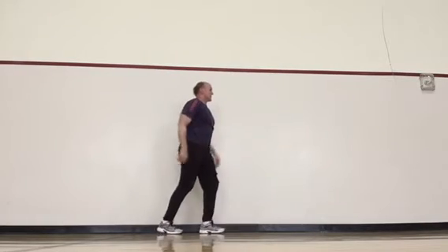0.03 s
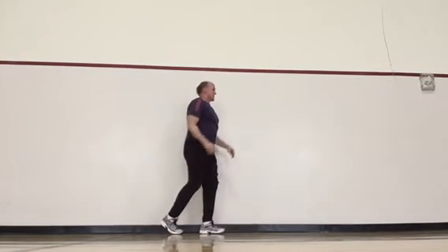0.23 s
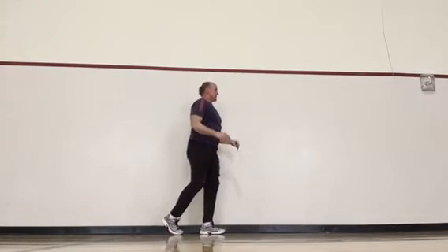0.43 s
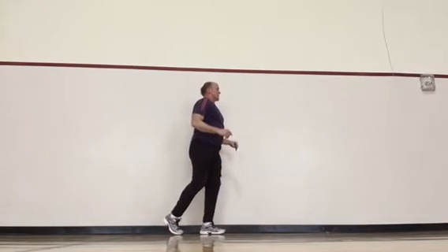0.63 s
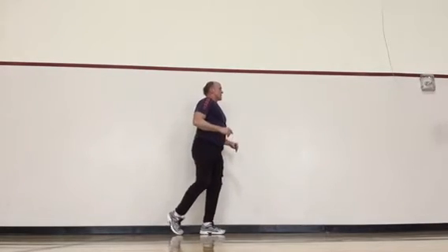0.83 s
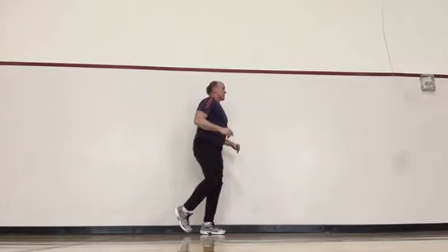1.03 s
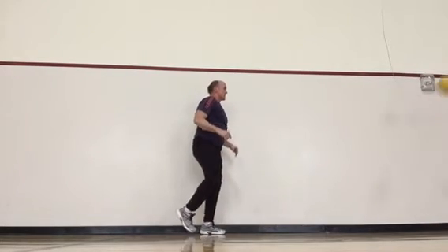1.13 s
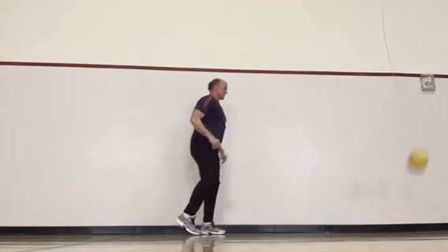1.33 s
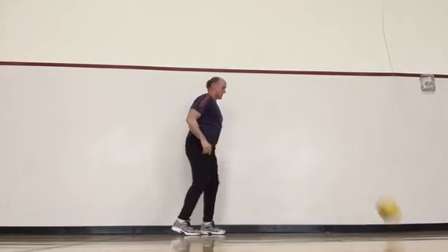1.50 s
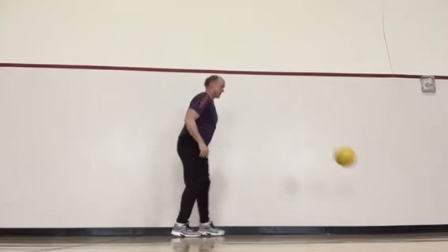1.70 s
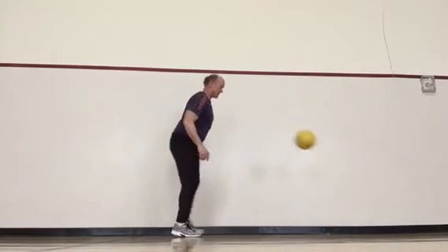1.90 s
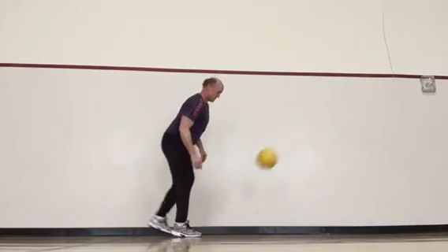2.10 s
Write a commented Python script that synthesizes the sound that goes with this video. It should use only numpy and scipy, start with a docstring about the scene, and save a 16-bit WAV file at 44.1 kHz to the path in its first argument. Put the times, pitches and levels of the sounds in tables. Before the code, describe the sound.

Two booming ball slaps, against wall then floor, ring through a big gym.

```python
"""In a big gym, a heavy rubber medicine ball slams into a wall and bounces once on the wooden floor.
Each blow is a sharp slap as the ball flattens, a low boom and a few clear echoes; then the hard hall
rings for seconds. At the start it still rings from an earlier blow, and near the end the thrower
takes a soft step. Quiet air noise and a faint electrical whine lie underneath."""
import sys
import numpy as np
from scipy import signal
from scipy.fft import rfft, irfft
from scipy.io import wavfile

SR = 44100
rng = np.random.default_rng(int(sys.argv[2]) if len(sys.argv) > 2 else 0)


def wav_record(signal):
    """Record a signal, one row per channel, as 16-bit PCM in the file named by sys.argv[1]."""
    frames = np.transpose(np.atleast_2d(signal))
    bounded = np.clip(frames, -1, 1)
    # unit amplitude maps onto the largest positive 16-bit level
    quanta = np.round(bounded * 32767).astype(np.int16)
    wavfile.write(sys.argv[1], SR, quanta)


N = 94815
WALL_S, FLOOR_S, STEP_S = .2466, 1.5919, 1.829   # when the ball hits, bounces, and the foot lands
TIME = np.arange(N) / SR
FFT_SIZE = 2 ** 17
FREQS = np.maximum(np.arange(FFT_SIZE // 2 + 1) * SR / FFT_SIZE, 1)


def wall_hit():
    """The ball slams into the wall, and both shake briefly."""
    # tone of the slap: f/Hz, relative level/dB
    tone = [(40, -6), (140, 13), (290, 30.5), (480, 19), (850, 20.5), (1250, 21.5), (2400, 15), (4700, 4.5),
            (5800, 10), (8500, 2), (11500, -6), (15000, -16.5)]
    # notes of ball and wall: f/Hz, level/dB, fade time/s (to fall by 60 dB), delay/s
    modes = [(73.4, -13, 0.14, 0.0056), (135, -7, 0.059, 0.00973), (890, -6.5, 0.043, 0.009)]
    # clear echoes: delay/s, level/dB, bass limit/Hz, treble limit/Hz
    echoes = [(.0028, -3.5, 24.7, 11550), (0.0329, -8, 25.3, 12000), (.036, -0.5, 25.2, 250),
              (0.087, -11, 300, 8000), (.099, -6.5, 350, 1380), (.16, -7.5, 25, 394), (.258, -9, 25, 400)]
    # sprays of tiny echoes: delay/s, level/dB, fade time/s, treble limit/Hz
    sprays = [(.001, -7.5, 0.036, 10000), (.006, -6.5, 0.03, 3970), (.027, -12.5, .07, 14000),
              (0.075, -8, .16, 8900)]
    # tone of the hall's ringing: f/Hz, relative level/dB
    tail = [(25, -82), (42, -47.5), (70, -42), (120, -47.5), (280, -47), (480, -57), (1100, -56.5),
            (2000, -60), (3200, -64.5), (4800, -67.5), (6000, -66), (8500, -72.5), (11000, -79),
            (15000, -85)]
    return delay(ball_hit(tone, modes, echoes, sprays, tail, slap_db=.4, tail_db=1.1), WALL_S)


def floor_bounce():
    """The ball lands and sets the floorboards booming."""
    # tone of the slap: f/Hz, relative level/dB
    tone = [(40, -12), (140, 22.5), (330, 19.5), (700, 20), (950, 12), (1350, 16), (2600, 18), (4800, 4.5),
            (5600, 8.5), (9000, -2), (11000, -12.5), (15000, -17)]
    # notes of ball and boards: f/Hz, level/dB, fade time/s, delay/s
    modes = [(61, -21, 0.45, 0.0204), (111, -22.5, 0.16, 0.11), (366, -14.5, 0.035, 0.00097)]
    # clear echoes: delay/s, level/dB, bass limit/Hz, treble limit/Hz
    echoes = [(.0056, -6.5, 200, 4000), (0.024, -31, 25, 3000), (0.0402, -18, 25, 6000),
              (.052, -19.5, 25, 3000), (.07, -24.5, 25, 5000), (.071, -11, 25, 300)]
    # sprays of tiny echoes: delay/s, level/dB, fade time/s, treble limit/Hz
    sprays = [(.0006, -8.5, 0.069, 7000), (.037, -13, .05, 5500), (.066, -16.5, .12, 5000)]
    # tone of the hall's ringing: f/Hz, relative level/dB
    tail = [(25, -87), (42, -57), (65, -60), (120, -57), (280, -54.5), (480, -63.5), (1100, -71),
            (2000, -68), (3200, -68.5), (4200, -71), (6000, -77), (8500, -89.5), (11000, -99),
            (15000, -104)]
    return delay(ball_hit(tone, modes, echoes, sprays, tail, slap_db=-1.8, tail_db=.66), FLOOR_S)


def ball_hit(tone, modes, echoes, sprays, tail, slap_db, tail_db):
    """One blow of the ball: slap and boom, their echoes, and the ringing hall."""
    contact = from_db(slap_db) * slap(tone)
    direct = contact + ring(modes)
    early = reflections(contact, echoes[:1]) + reflections(direct, echoes[1:]) + scatter(contact, sprays)
    return direct + early + from_db(tail_db) * hall_answer(tail)


def slap(tone, spread_hz=(4500, 2600, 450)):
    """One push of air: the treble comes first and the bass follows as the ball flattens."""
    # build the most sudden pulse that has this tone (minimum phase)
    cepstrum = irfft(np.log(from_db(at_hz(tone, FREQS))))
    cepstrum[1:FFT_SIZE // 2] *= 2
    cepstrum[FFT_SIZE // 2 + 1:] = 0
    pulse = np.exp(rfft(cepstrum))
    for hz in spread_hz:
        s = 1j * FREQS / hz
        pulse = pulse * (s * s - s + 1) / (s * s + s + 1)   # delays the lows, keeps their level
    return irfft(pulse)[:N]


def ring(modes, attack_s=.0013):
    """A struck thing rings with its own notes (modes), each rising quickly and dying away."""
    attack = 1 - np.exp(-TIME / attack_s)
    return sum(delay(attack * from_db(db) * fade(fade_s) * np.sin(2 * np.pi * hz * TIME), lag_s)
               for hz, db, fade_s, lag_s in modes)


def reflections(x, echoes):
    """Floor and walls send back single echoes, each losing some bass and treble."""
    out = 0
    for lag_s, db, low_hz, high_hz in echoes:
        surface = signal.butter(1, [low_hz, max(high_hz, 2 * low_hz)], "band", fs=SR)
        out += from_db(db) * delay(signal.lfilter(*surface, x), lag_s)
    return out


def scatter(x, sprays):
    """Uneven surfaces break a sound into short, dull sprays of tiny echoes."""
    response = 0
    for lag_s, db, fade_s, high_hz in sprays:
        spray = rng.standard_normal(N) * fade(fade_s)
        dulled = signal.lfilter(*signal.butter(1, high_hz, fs=SR), spray / np.linalg.norm(spray))
        response += from_db(db) * delay(dulled, lag_s)
    return signal.fftconvolve(x, response)[:N]


def hall_answer(tone, gap_s=.032, rise_s=.013, dip_share=.48, return_s=.35):
    """The far walls answer after a gap; echoes come in clumps, then blend into a long ringing."""
    clump_db, clump_s, blend_s = 3, .003, .074
    rise = 1 - np.exp(-TIME / rise_s)
    # the ringing starts held down and comes back up, so it fades slowly at first
    dip = 1 - dip_share * np.exp(-TIME / return_s)
    clumps = np.interp(TIME / clump_s, np.arange(N), rng.standard_normal(N))
    flutter = from_db(clump_db * clumps * np.exp(-TIME / blend_s))
    return delay(hall_decay(tone) * rise * dip * flutter, gap_s)


def hall_decay(tone):
    """The hall's countless notes blur into noise, and each band of it fades at its own speed."""
    # how long the hall rings: f/Hz, fade time/s
    fade_times = [(60, 2.97), (150, 3.5), (300, 2.9), (550, 4.94), (900, 6.4), (1600, 6), (2700, 3.75),
                  (4000, 2.44), (5000, 1.62), (6300, 1.22), (8300, 0.79), (11000, 0.5), (15000, 0.41)]
    # pitches the hall boosts or weakens: f/Hz, width/Hz, gain/dB
    resonances = [(89, 10, 3.5), (165, 53, 1.5), (219, 10, -5), (285, 40, 1.5), (591, 13, -3),
                  (640, 30, 5.5), (737, 29, 4), (888, 76, 6), (1086, 20, 3)]
    colour_db = sum(db * np.exp(-2 * ((FREQS - hz) / width) ** 2) for hz, width, db in resonances)
    noise = noise_spectrum(at_hz(tone, FREQS) + colour_db)
    centres_hz = np.geomspace(20, 16000, 30)
    band_position = np.interp(np.log(FREQS), np.log(centres_hz), np.arange(len(centres_hz)))
    out = 0
    for k, hz in enumerate(centres_hz):
        band = np.maximum(1 - abs(band_position - k), 0)
        out += irfft(noise * band)[:N] * fade(at_hz(fade_times, hz))
    return out


def standing_waves():
    """The wall hit leaves long notes in the hall; those close in pitch throb together."""
    # notes of the hall: f/Hz, level/dB, fade time/s, delay/s
    modes = [(90.1, -22.5, 1.5, .04), (169.6, -31, 4.9, .06), (263.8, -32, 4.34, .08),
             (295.7, -29.5, 3.4, .05), (850, -40.5, 12, .15), (898, -39, 11, .1), (907, -41, 13, .1),
             (925, -41, 5.7, 0.2)]
    return delay(ring(modes), WALL_S)


def footstep():
    """The thrower's foot lands with a soft thud."""
    # notes of the floorboards: f/Hz, level/dB, fade time/s, delay/s
    modes = [(117, -24.5, .22, 0.0028), (297, -29, 0.088, 0.016)]
    return delay(ring(modes), STEP_S)


def earlier_blow():
    """The hall is still ringing from a blow before the start."""
    # tone of that ringing: f/Hz, relative level/dB
    tail = [(25, -90.5), (60, -66.5), (140, -70), (280, -65.5), (500, -75.5), (800, -69.5), (1200, -68),
            (2000, -67.5), (3000, -77), (4200, -86), (5200, -99), (7000, -113), (11000, -135)]
    return hall_decay(tail)


def background(whine_hz=5820, whine_db=-76):
    """Quiet air noise and a thin, steady electrical whine."""
    # tone of the air noise: f/Hz, level/dB in each 1 Hz slice
    air_tone = [(25, -84.5), (60, -73), (200, -76), (1000, -73.5), (3000, -98.5), (5000, -111),
                (8000, -119), (11000, -124), (15000, -124)]
    air = irfft(noise_spectrum(at_hz(air_tone, FREQS)))[:N]
    return air + from_db(whine_db) * np.sin(2 * np.pi * whine_hz * TIME)


def from_db(db):
    """Turn decibels into a number to multiply by."""
    return 10 ** (np.asarray(db) / 20)


def fade(seconds):
    """A level that falls by 60 dB in the given time."""
    return from_db(-60 * TIME / seconds)


def at_hz(points, hz):
    """Read between a table's rows, with octaves evenly spaced."""
    table_hz, values = np.transpose(points)
    return np.interp(np.log(hz), np.log(table_hz), values)


def delay(x, seconds):
    """The same sound, starting later."""
    return np.concatenate([np.zeros(int(seconds * SR)), x])[:N]


def noise_spectrum(db):
    """Random noise as a spectrum, with the given level in each 1 Hz slice."""
    return rfft(rng.standard_normal(FFT_SIZE)) * from_db(db) * np.sqrt(SR / 2)


def scene():
    """Wall hit, floor bounce and footstep over the fading hall, in one channel."""
    return (wall_hit() + floor_bounce() + standing_waves() + footstep() + earlier_blow() + background())[None]


def record(dry, low_cut_hz=42, high_cut_hz=15200):
    """The microphone drops the deepest bass, rounds off the loudest peaks and cuts the top treble."""
    heard = signal.sosfilt(signal.butter(4, low_cut_hz, "high", fs=SR, output="sos"), dry)
    rounded = heard / (1 + heard ** 4) ** (1 / 4)
    return signal.sosfilt(signal.ellip(10, .1, 80, high_cut_hz, fs=SR, output="sos"), rounded)


dry = scene()
out = record(dry)
wav_record(out)
```